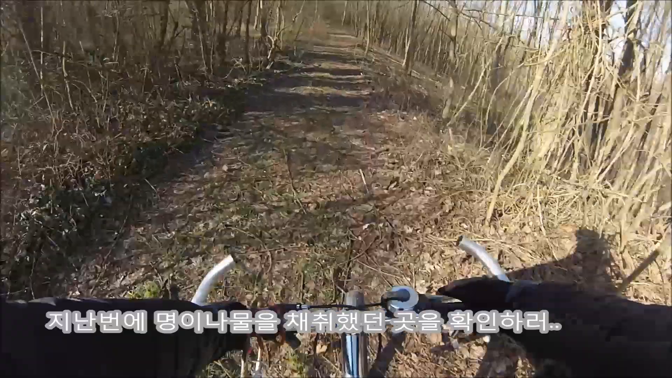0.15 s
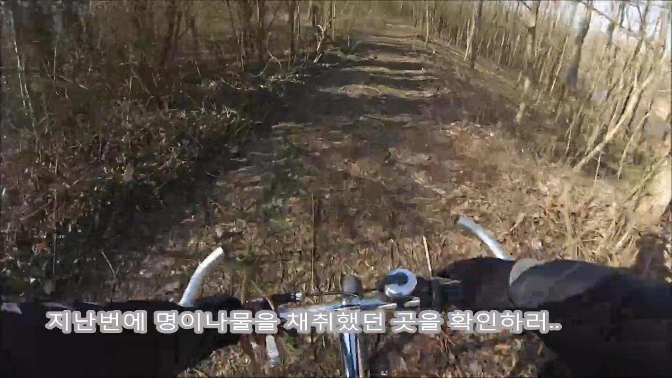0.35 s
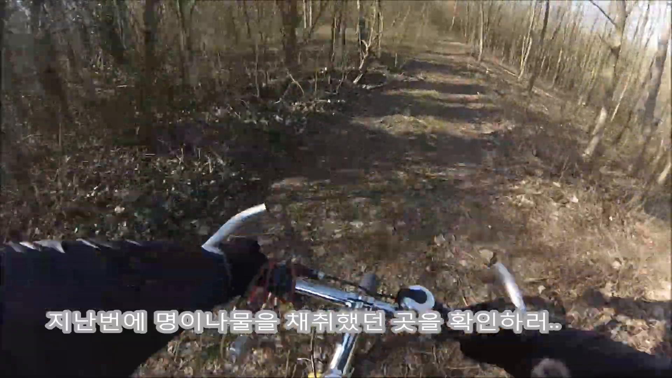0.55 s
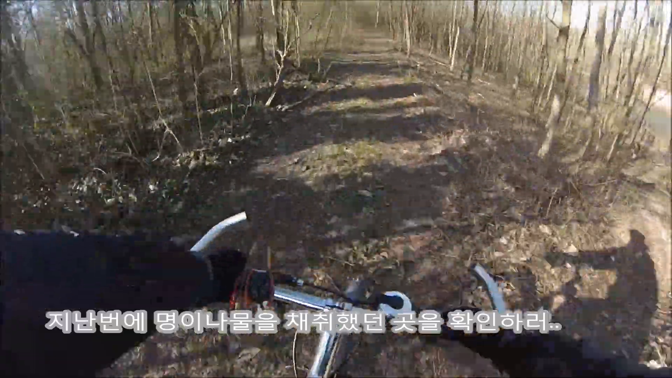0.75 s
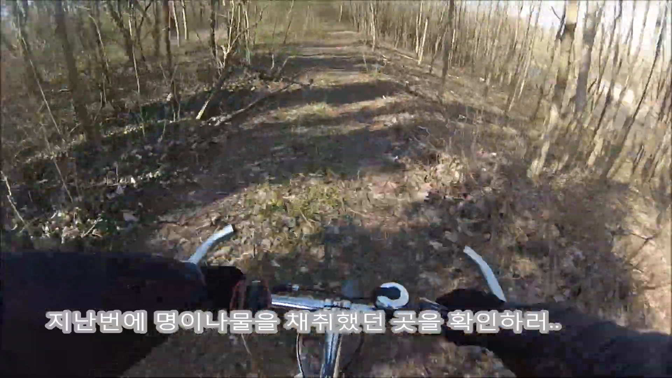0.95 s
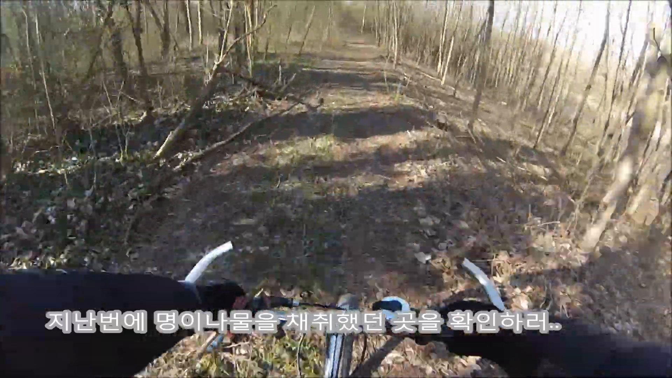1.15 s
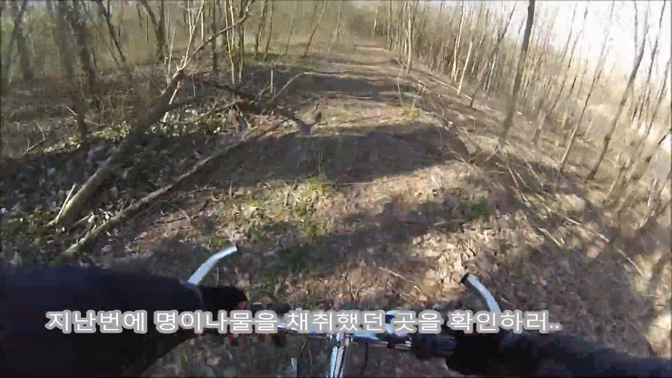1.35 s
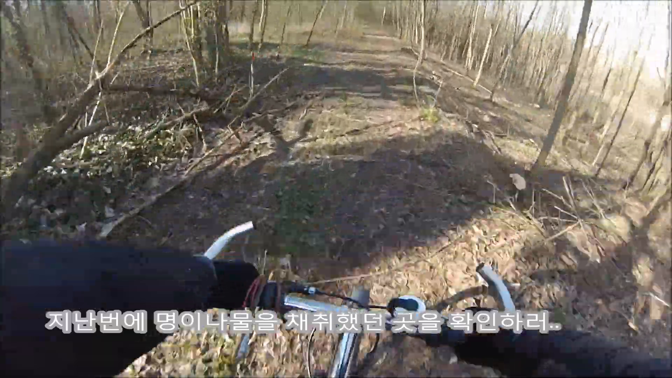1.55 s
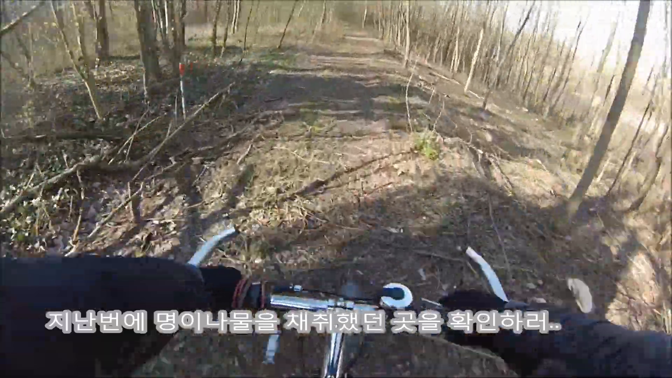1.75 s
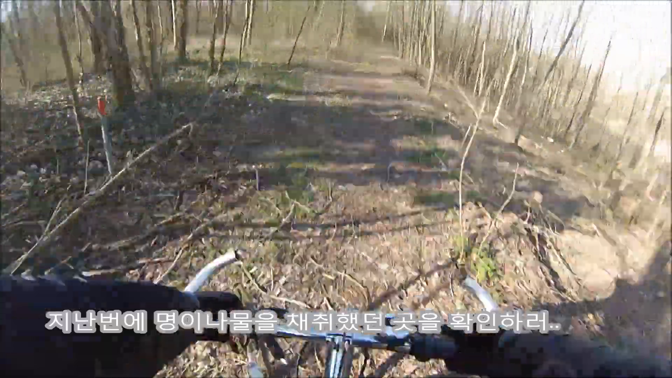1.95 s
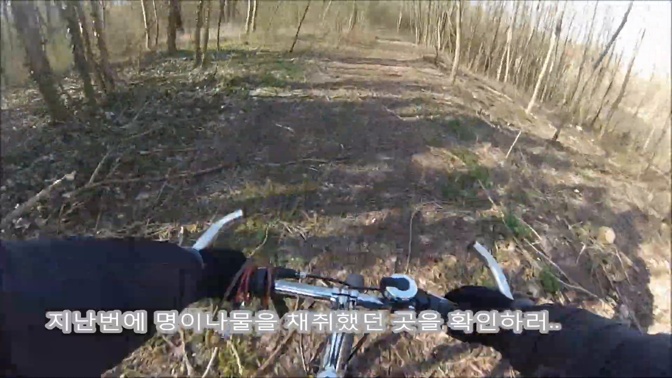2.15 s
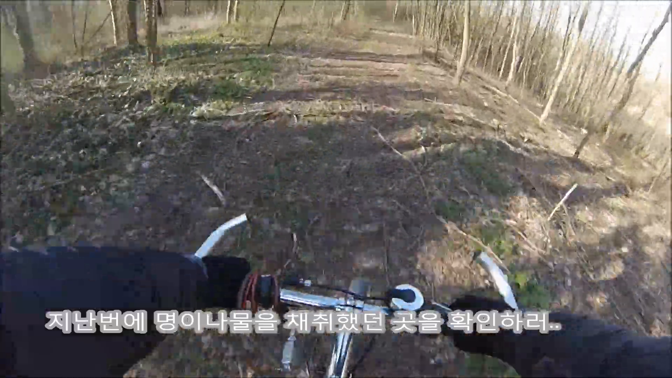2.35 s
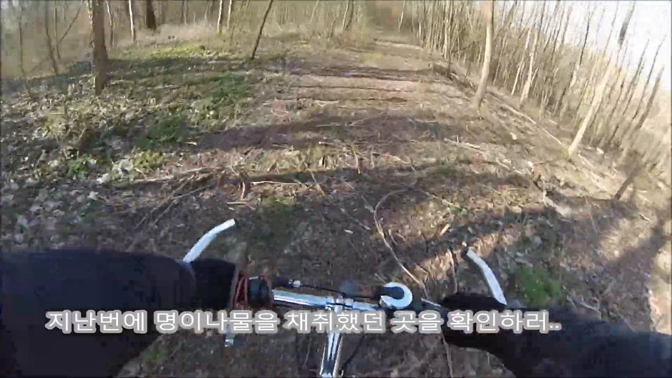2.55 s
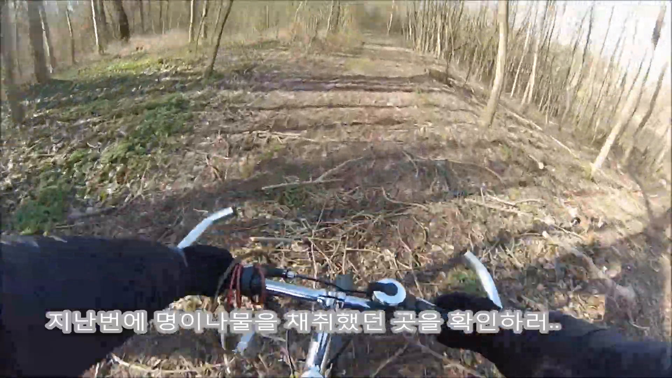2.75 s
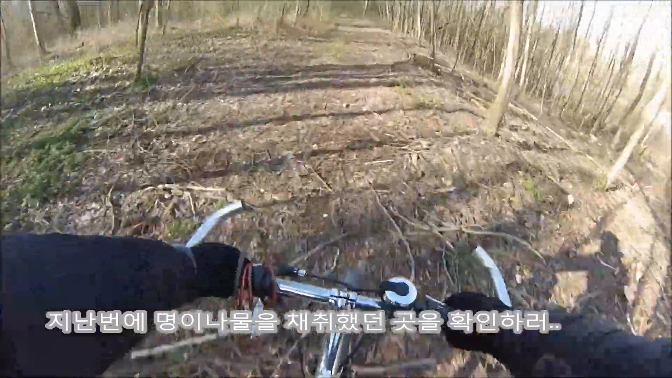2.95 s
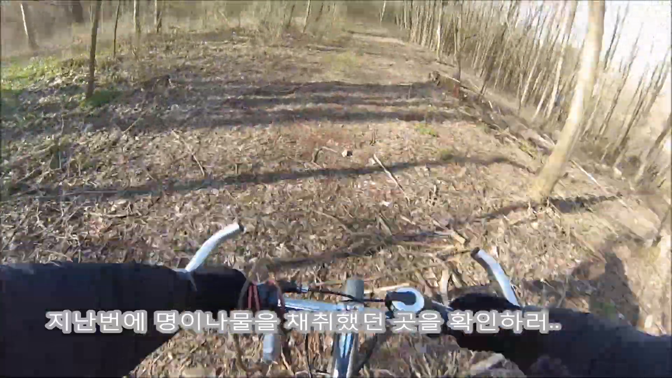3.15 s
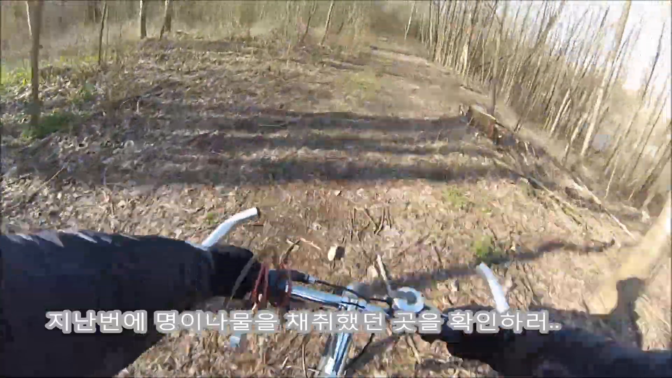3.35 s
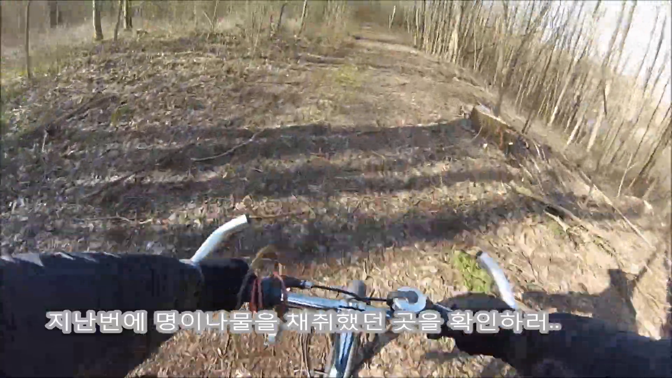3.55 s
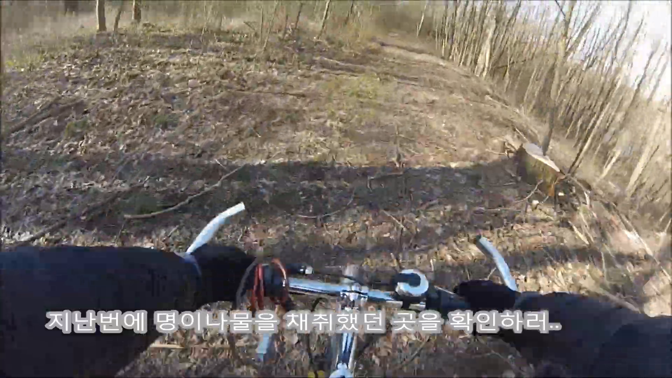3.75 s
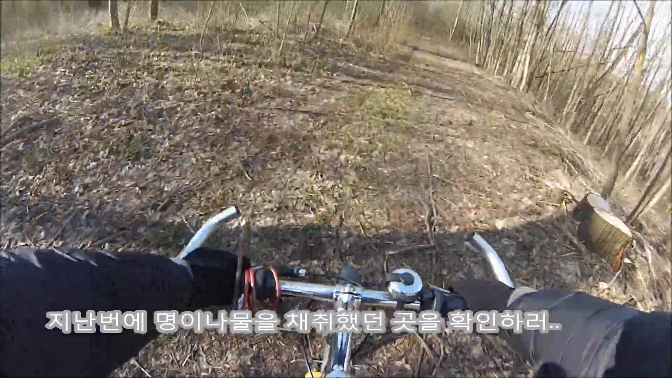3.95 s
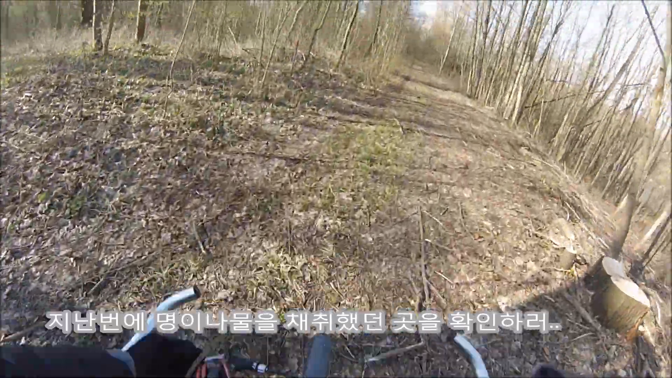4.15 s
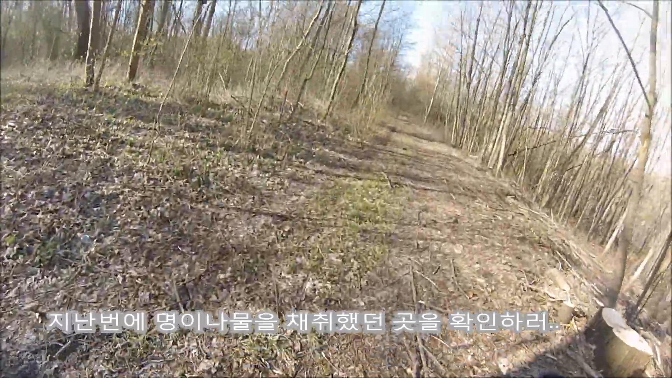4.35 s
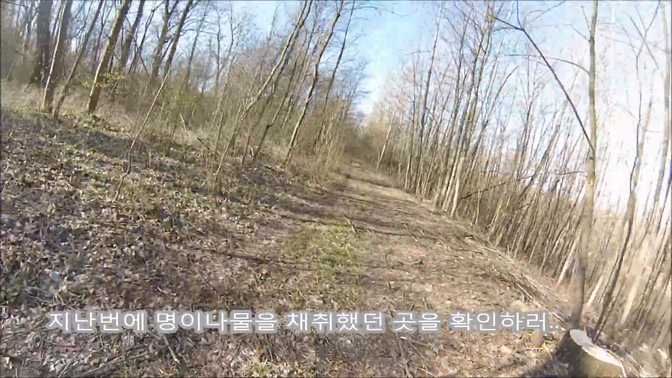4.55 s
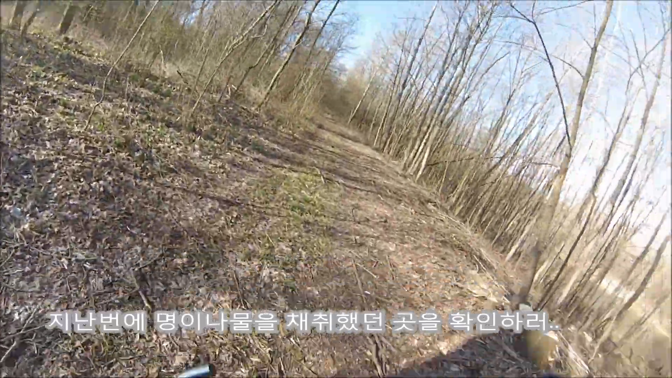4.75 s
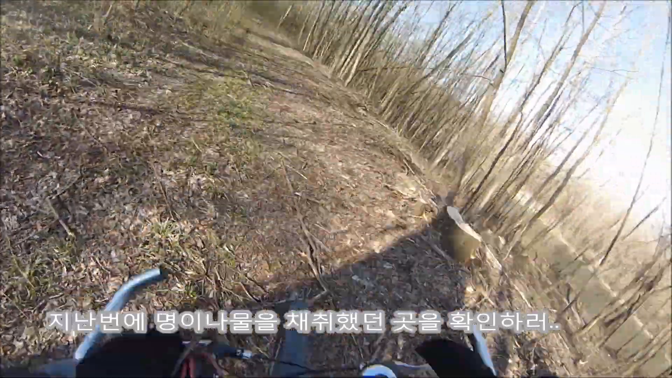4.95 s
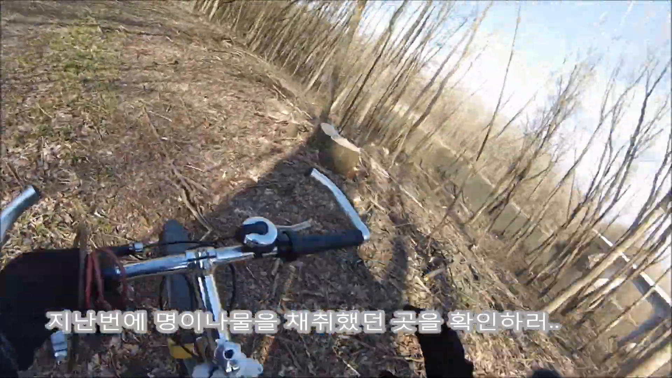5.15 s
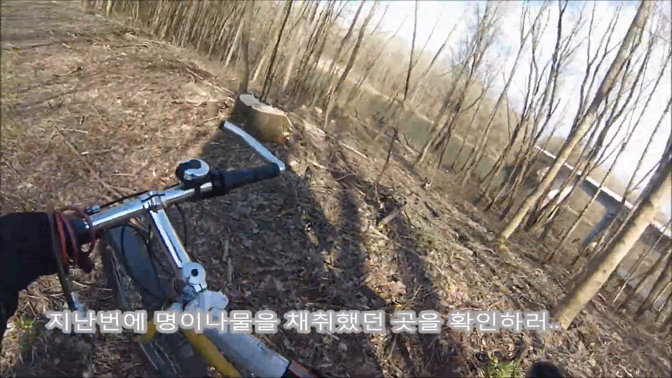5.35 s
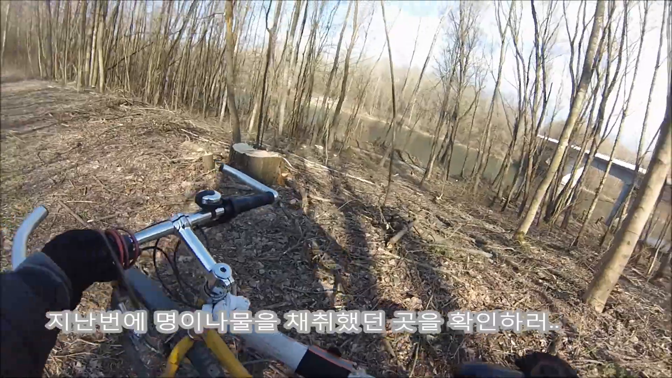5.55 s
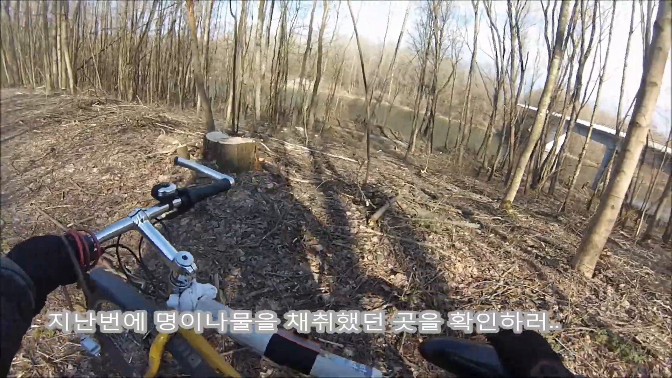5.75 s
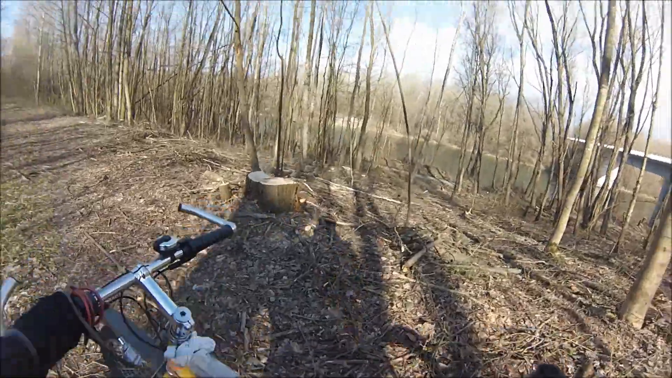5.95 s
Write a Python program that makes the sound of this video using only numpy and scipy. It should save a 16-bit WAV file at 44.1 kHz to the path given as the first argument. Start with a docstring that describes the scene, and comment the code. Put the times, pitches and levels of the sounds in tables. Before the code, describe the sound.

A rough bike ride outdoors, captured by a body-worn microphone: deep lumpy wind dominates, with crisp leaf crunches, dull rattling bumps and sharp little twig cracks, strongest around two and three and a half seconds. Then rolling ends abruptly. The quiet remainder holds short cloth rustles, a low rub of the moving body, and a few scuffs and soft thuds against the microphone case.

```python
"""A bicycle rolls along a forest path, heard from the rider's body, over a faint forest hush.
Wind rumbles on the microphone as coloured noise; tyres crush dry leaves as clumps of random clicks.
Bumps knock the frame and twigs snap as struck modes; metal parts ring and squeak faintly as sine tones.
After four seconds it stops; as the rider gets off, sleeves swish as clicks through the case's cavities
and brush against the microphone case as short scuffs and thuds."""
import sys
import numpy as np
from scipy import signal
from scipy.fft import rfft, irfft
from scipy.io import wavfile
from scipy.ndimage import uniform_filter1d

SR = 44100
rng = np.random.default_rng(int(sys.argv[2]) if len(sys.argv) > 2 else 0)


def store_wav(level_fs):
    """Save 16-bit WAV to argv[1]."""
    pcm = np.round(np.clip(np.atleast_2d(level_fs), -1, 1) * 32767)
    wavfile.write(sys.argv[1], SR, pcm.T.astype(np.int16))


N = 264864
TIME = np.arange(N) / SR


def from_db(db):
    """Decibels to amplitude gain."""
    return 10 ** (np.asarray(db) / 20)


def rms_one(x):
    """Scale to rms 1."""
    return x / np.sqrt(np.mean(x ** 2) + 1e-20)


def in_time(rows):
    """Interpolate each column of a curve table, sample by sample."""
    s, *columns = np.transpose(rows)
    return [np.interp(TIME, s, c) for c in columns]


def band(x, low_hz, high_hz, order=2):
    """Causal Butterworth band-pass."""
    edges_hz = [low_hz, min(high_hz, 0.45 * SR)]
    sos = signal.butter(order, edges_hz, "band", fs=SR, output="sos")
    return signal.sosfilt(sos, x + 1e-18)


def colour(x, points):
    """Give a steady sound a spectrum, falling 24 dB per octave outside the points; rms 1."""
    hz, db = np.transpose(points)
    freqs = np.maximum(np.arange(N // 2 + 1) * SR / N, 1)
    octaves_outside = np.abs(np.log2(freqs / np.clip(freqs, hz[0], hz[-1])))
    gain_db = np.interp(np.log(freqs), np.log(hz), db) - 24 * octaves_outside
    return rms_one(irfft(rfft(x) * from_db(gain_db), N))


def drift(rate_hz):
    """Smooth random curve with rms 1: noise through a double pole at rate_hz."""
    step = 40  # samples per slow point
    r = np.exp(-2 * np.pi * rate_hz * step / SR)
    noise = rng.standard_normal(N // step + 2002)
    slow = signal.lfilter([1], [1, -2 * r, r * r], noise)[2000:]  # drop the run-in
    return np.interp(np.arange(N) / step, np.arange(len(slow)), rms_one(slow))


def steady(x, window_s):
    """Even out slow swells, so that the driving force alone sets the level."""
    return x / np.sqrt(uniform_filter1d(x ** 2, int(window_s * SR)) + 1e-6)


def grains(per_s, spread_db):
    """Random clicks of either sign, mostly small and a few large; rms 1."""
    sizes = from_db(spread_db * np.minimum(rng.exponential(1, N), 4))
    signs = rng.choice([-1, 1], N)
    return rms_one(sizes * signs * (rng.random(N) < per_s / SR))


def clicks(times_s, heights):
    """One single-sample click at each time."""
    out = np.zeros(N)
    out[np.round(np.asarray(times_s) * SR).astype(int)] = heights
    return out


def strike(times_s, db, modes, vary_db):
    """Each blow rings every decaying mode with a random strength of its own."""
    out = 0
    chance = rng.standard_normal((len(times_s), len(modes)))
    for k, (hz, mode_db, t60_s) in enumerate(modes):
        r = from_db(-60 / (t60_s * SR))
        w = 2 * np.pi * hz / SR
        blows = clicks(times_s, from_db(db + mode_db + vary_db * chance[:, k]))
        ring = signal.lfilter([0, np.sin(w)], [1, -2 * r * np.cos(w), r * r], blows + 1e-18)
        out = out + (-1) ** k * ring
    return out


def swells(times_s, half_s, db):
    """Summed power of rounded swells, as a gain."""
    power = 0
    for s, half, peak_db in np.broadcast(times_s, half_s, db):
        power = power + from_db(2 * peak_db) / (1 + ((TIME - s) / half) ** 2 / 2) ** 4
    return np.sqrt(power)


def tone(hz):
    """Sine that follows a frequency curve."""
    return np.sin(2 * np.pi * np.cumsum(hz) / SR)


# hush spectrum: (frequency [Hz], relative level [dB])
HUSH_COLOUR = [(35, -41), (60, 9), (110, -16), (159, -10), (413, -11.5), (521, -16.5), (1320, -23.5),
               (1870, -25.5), (2840, -27.5), (3760, -24), (4630, -34.5), (5450, -31.5), (15500, -36)]


def forest_hush():
    """Steady coloured noise."""
    return from_db(-72.0) * colour(rng.standard_normal(N), HUSH_COLOUR)


# headwind on the port, falling away as the bicycle stops: (time [s], level [dB])
WIND = [(0.0, -52), (1.4, -48), (2.5, -47.5), (2.95, -43), (3.45, -45.5), (3.6, -51.5), (4.02, -48),
        (4.09, -69), (4.9, -75), (5.3, -61), (6.0, -69.5)]
# wind spectrum: (frequency [Hz], relative level [dB])
WIND_COLOUR = [(18, 1), (28, 3.5), (39, 2), (55, -2.5), (75, -11.5), (100, -17), (150, -25), (250, -39),
               (500, -53)]
# bicycle pitches over humps, buffeting the port: (time [s], level [dB])
BUFFETS = [(0.262, -44), (0.37, -42.5), (0.73, -44.5), (1.13, -47.5), (1.44, -46), (1.55, -43),
           (1.7, -42.5), (1.82, -42.5), (2.039, -36.5), (2.182, -41.5), (2.45, -41), (2.582, -43.5),
           (2.82, -46), (3.06, -37.5), (3.48, -41), (3.721, -42)]
BUFFET_HALF_S = 0.036


def wind(lumpy_db=2.0):
    """Lumpy low turbulence at the port, swelling in buffets, much weaker after the stop."""
    level_db, = in_time(WIND)
    humps_s, hump_db = np.transpose(BUFFETS)
    headwind = from_db(level_db + lumpy_db * drift(rate_hz=7.9))
    force = np.hypot(headwind, swells(humps_s, BUFFET_HALF_S, hump_db))
    return force * steady(colour(rng.standard_normal(N), WIND_COLOUR), window_s=0.055)


# steady rolling: (time [s], leaf crunch level [dB], frame shudder level [dB])
ROLLING = [(0.0, -76, -72), (1.3, -76.5, -69.5), (1.7, -73, -66.5), (2.3, -80.5, -73.5), (2.7, -71.5, -66),
           (2.9, -79, -65.5), (3.3, -69.5, -65), (3.55, -75.5, -69.5), (4.1, -80.5, -77)]
# patches of dry leaves under the wheels: (time [s], half length [s], crunch level [dB])
PATCHES = [(0.101, 0.018, -69.5), (0.361, 0.05, -63), (0.484, 0.013, -66), (0.571, 0.035, -66),
           (0.89, 0.033, -77), (0.947, 0.012, -64), (1.02, 0.033, -62.5), (1.17, 0.03, -69.5),
           (1.443, 0.02, -72.5), (1.546, 0.0091, -63.5), (1.845, 0.031, -64.5), (1.999, 0.045, -58.5),
           (2.143, 0.072, -64.5), (2.302, 0.021, -73), (2.411, .012, -67), (2.483, .015, -69),
           (2.594, 0.0063, -59.5), (2.813, 0.032, -69), (3.024, 0.048, -59), (3.243, 0.018, -65.5),
           (3.432, 0.041, -56), (3.705, 0.038, -62.5)]
# leaf and shudder spectra: (frequency [Hz], relative level [dB])
LEAF_COLOUR = [(400, -26), (800, -9.5), (1150, -6), (1550, 3), (1950, -3), (2600, 6), (3400, 5),
               (4000, -2.5), (4550, 8), (5500, -4.5), (7200, -11), (10500, -14.5), (15500, -18)]
SHUDDER_COLOUR = [(80, -8.5), (140, 0), (220, 1), (350, 3.5), (470, -8.5), (660, -16), (850, -10),
                  (1200, -29.5), (2500, -52)]
# frame shudder relative to patch crunch, and to hump buffet
PATCH_SHUDDER_DB, HUMP_SHUDDER_DB = -2.5, -24


def tyres(uneven_db=2.0):
    """Leaves break in clumps of tiny cracks, swelling in each patch; patches and humps shake the frame."""
    crunch_db, shudder_db = in_time(ROLLING)
    patches_s, half_s, patch_db = np.transpose(PATCHES)
    humps_s, hump_db = np.transpose(BUFFETS)
    ground_db = uneven_db * drift(rate_hz=5.3)

    crunch = np.hypot(from_db(crunch_db + ground_db), swells(patches_s, half_s, patch_db))
    cracks = grains(per_s=3800, spread_db=1.5) * from_db(3.62 * drift(rate_hz=60))
    leaves = steady(colour(cracks, LEAF_COLOUR), window_s=0.048)

    patch_jolts = swells(patches_s, half_s, patch_db + PATCH_SHUDDER_DB)
    hump_jolts = swells(humps_s, BUFFET_HALF_S, hump_db + HUMP_SHUDDER_DB)
    shake = np.hypot(from_db(shudder_db + ground_db), np.hypot(patch_jolts, hump_jolts))
    shudder = steady(colour(grains(per_s=200, spread_db=2.5), SHUDDER_COLOUR), window_s=0.11)
    return crunch * leaves + shake * shudder


# metal part singing while the wheels turn: (time [s], level [dB])
SINGING = [(0.0, -103), (0.9, -95), (1.39, -103), (1.43, -83), (1.75, -94), (2.2, -84), (2.9, -96),
           (3.5, -96), (4.12, -104)]


def singing_metal(pitch_hz=8660, waver=0.003, flicker_db=3.0):
    """A thin partial with unsteady pitch and level."""
    level_db, = in_time(SINGING)
    level = from_db(level_db + flicker_db * drift(rate_hz=4.1))
    return level * tone(pitch_hz * (1 + waver * drift(rate_hz=20)))


# harder bumps: (time [s], blow level [dB])
KNOCKS = [(0.042, -56), (0.274, -48.5), (0.577, -51), (0.711, -52), (0.746, -53), (1.114, -48),
          (1.145, -51.5), (1.267, -52), (1.426, -48.5), (1.68, -47), (1.749, -52), (2.001, -43),
          (2.046, -53), (2.098, -51.5), (2.284, -55.5), (2.806, -50.5), (2.848, -46), (2.901, -55),
          (2.974, -46), (3.019, -47), (3.119, -54), (3.2, -52), (3.4, -46.5), (3.444, -56), (3.579, -53.5),
          (3.952, -52.5), (3.996, -57.5), (4.109, -53), (4.196, -52)]
# frame and mount modes: (frequency [Hz], relative level [dB], t60 [s])
FRAME_MODES = [(165, -1, 0.027), (250, 2, 0.03), (339, 0.5, 0.037), (443, -1, 0.0094), (920, -14, 0.021)]


def frame():
    """Roots and stones excite the frame modes in dull knocks."""
    times_s, db = np.transpose(KNOCKS)
    return band(strike(times_s, db, FRAME_MODES, vary_db=2.4), 68, 1200)


def jolted_metal(pitch_hz=14633, waver=0.00092, below_buffet_db=-42, half_s=0.056):
    """A higher partial flares on each hump."""
    humps_s, hump_db = np.transpose(BUFFETS)
    flare = swells(humps_s, half_s, hump_db + below_buffet_db)
    return flare * tone(pitch_hz * (1 + waver * drift(rate_hz=15)))


# twigs breaking: (time [s], blow level [dB], treble relative to blow [dB])
SNAPS = [(0.2855, -53, -5), (0.313, -49.5, -15), (1.155, -55.5, -26), (1.449, -50.5, -25),
         (1.544, -52, -18), (1.849, -49, -26), (1.947, -48.5, -25), (2, -44, -21), (2.0085, -29, -27),
         (2.101, -43.5, -21), (2.6042, -48.5, -27), (2.9772, -40, -22), (3.0182, -45.5, -30),
         (3.1987, -48.5, -21), (3.2275, -47, -1.5), (3.3094, -54, -30), (3.3431, -46, -32),
         (3.4048, -43, -19), (3.4461, -40.5, -29), (4.0664, -53.5, -33), (4.9128, -63.5, 7),
         (4.9825, -52.5, -7)]
# snap ringing in the microphone case: (frequency [Hz], relative level [dB], t60 [s])
SNAP_MODES = [(1390, -6.5, 0.003), (2770, -5.5, 0.0054), (3120, -3.5, 0.0032), (3820, -3.5, 0.0042),
              (4430, -6.5, 0.012), (5870, -19, 0.0064)]


def twigs(splinter_s=0.0028, give_s=0.0026):
    """Fibres crackle around each break, which rings the case and throws a brief bright spray."""
    times_s, db, treble_db = np.transpose(SNAPS)
    crack = strike(times_s, db, SNAP_MODES, vary_db=1.8)

    strain = 0
    for s, peak_db in zip(times_s, db):
        strain = strain + from_db(peak_db) * np.exp(-np.abs(TIME - s) / give_s)
    fibres = from_db(-14.0) * strain * colour(grains(per_s=7000, spread_db=5.5), LEAF_COLOUR)

    breaks = clicks(times_s, from_db(db + treble_db))
    burst = signal.lfilter([1], [1, -np.exp(-1 / (splinter_s * SR))], breaks)
    spray = from_db(-6.5) * burst * rms_one(band(rng.standard_normal(N), 4600, 12700))
    return crack + fibres + spray


# tiny squeaks: (time [s], length [s], start pitch [Hz], end pitch [Hz], peak level [dB])
SQUEAKS = [(0.87, 0.0046, 1440, 1500, -58), (1.327, 0.017, 9700, 11100, -75),
           (1.525, 0.27, 3590, 3550, -79), (2.312, .04, 12200, 10500, -79), (2.44, 0.1, 14600, 13900, -79),
           (2.545, 0.033, 10700, 10000, -81), (3.633, 0.048, 10750, 10600, -79.5)]


def squeaks(rough=0.0095):
    """Now and then a metal part squeaks in a short rough glide."""
    out = 0
    waver = 1 + rough * drift(rate_hz=400)
    for s, length_s, start_hz, end_hz, db in SQUEAKS:
        part = np.clip((TIME - s) / length_s, 0, 1)
        glide_hz = start_hz + (end_hz - start_hz) * part
        out = out + from_db(db) * np.sin(np.pi * part) * tone(glide_hz * waver)
    return out


def cloth_hiss(resonances):
    """Threads catching on threads excite each cavity of the case; rms 1."""
    out = 0
    for hz, width_hz, db in resonances:
        threads = grains(per_s=14000, spread_db=3.5)
        out = out + from_db(db) * rms_one(band(threads, hz - width_hz / 2, hz + width_hz / 2))
    return rms_one(out)


# jacket strokes: (start [s], end [s], level [dB], edge relative to swish [dB], swell start to end [dB])
STROKES = [(4.142, 4.214, -67, -5, -1), (4.268, 4.299, -62.5, -6, -2), (4.355, 4.443, -55.5, -6.5, 0.5),
           (4.453, 4.486, -66, -3, -4), (4.488, 4.566, -56, -1, 9), (4.593, 4.682, -59, -3, -4),
           (4.68, 4.777, -70.5, 2, -7), (5.011, 5.127, -65.5, 4, 4.5), (5.137, 5.186, -64.5, 4.5, 2),
           (5.205, 5.31, -71.5, -2.5, -1), (5.334, 5.482, -61.5, -0.5, -5.5),
           (5.561, 5.57, -45.5, -2, -4.5), (5.604, 5.662, -64.5, -2.5, 5), (5.694, 5.78, -68.5, -4.5, -2),
           (5.79, 5.85, -66.5, 1, 0)]
# case cavities, soft swish to keen edge and air: (frequency [Hz], width [Hz], relative level [dB])
CLOTH_SWISH = [(2386, 690, -8.5), (2965, 770, 2), (3770, 380, -17.5)]
CLOTH_EDGE = [(4593, 490, 1.5), (5260, 250, -10), (6210, 690, -9)]
CLOTH_AIR = [(8030, 830, -4.5), (9850, 1300, 1.5), (11800, 1100, -8), (12500, 3200, 0)]
# low rub of the moving body: (time [s], level [dB])
RUB = [(4.1, -79), (4.47, -69), (4.602, -75), (4.778, -75), (5.43, -70), (5.594, -74), (5.822, -80),
       (6.006, -74)]
# body shifting against the frame, a dull rumble: (time [s], half length [s], level [dB])
SHIFTS = [(5.103, 0.0077, -62), (5.439, 0.013, -57.5), (5.471, 0.011, -52.5), (5.562, 0.0065, -57.5),
          (5.807, .008, -59.5)]
# rub spectrum: (frequency [Hz], relative level [dB])
RUB_COLOUR = [(53, -40), (90, -26), (102, -2.5), (225, -10.5), (334, -3), (452, -16.5), (620, -25.5),
              (825, -18), (1170, -28), (1600, -22), (2080, -40), (3520, -120)]


def sleeves(rise_s=0.0052, fall_s=0.0084, lingering_db=-82, air_db=-6.5):
    """Cloth strokes swell or fade over a soft low rub; a trace of rustle lasts between them."""
    start, end, db, edge_db, swell_db = np.transpose(STROKES)[..., None]
    opening = (1 + np.tanh((TIME - start) / (2 * rise_s))) / 2
    closing = (1 + np.tanh((end - TIME) / (2 * fall_s))) / 2
    part = np.clip((TIME - start) / (end - start), 0, 1)
    strokes = opening * closing * from_db(db + swell_db * (part - 0.5))
    swish = strokes.sum(axis=0)
    edge = (strokes * from_db(edge_db)).sum(axis=0)
    trace = from_db(lingering_db + 3.3 * drift(rate_hz=48))

    hiss = np.hypot(swish, trace) * cloth_hiss(CLOTH_SWISH)
    hiss = hiss + np.hypot(edge, 0.5 * trace) * cloth_hiss(CLOTH_EDGE)
    hiss = hiss + from_db(air_db) * edge * cloth_hiss(CLOTH_AIR)

    rub_db, = in_time(RUB)
    rub_force = np.hypot(from_db(rub_db), swells(*np.transpose(SHIFTS)))
    rub = rub_force * colour(grains(per_s=1100, spread_db=4.5), RUB_COLOUR)
    return from_db(0.8 * drift(rate_hz=220)) * hiss + rub


# sleeve on case: (time [s], scuff level [dB], half length [s], thud peak [dB], thud frequency [Hz])
BRUSHES = [(4.561, -57, 0.003, -53, 120), (5.199, -50.5, 0.0084, -37.5, 59.4),
           (5.3465, -42.5, 0.0015, -43, 200), (5.4778, -45, 0.0036, -41, 214),
           (5.564, -58.5, 0.011, -57, 150)]
# scuff spectrum: (frequency [Hz], relative level [dB])
SCUFF_COLOUR = [(260, 9), (380, 0), (540, -13), (850, -11.5), (1300, -13.5), (2100, -6), (3050, -0.5),
                (3900, -3.5), (4600, 1.5), (5600, -15.5), (9000, -21.5), (15000, -20.5)]


def brushes():
    """Cloth catches on the case: a short scuff and one push and pull of air at the port."""
    out = 0
    noise = colour(rng.standard_normal(N), SCUFF_COLOUR)
    for s, scuff_db, half_s, thud_db, thud_hz in BRUSHES:
        scuff = from_db(scuff_db) * noise / np.sqrt(1 + ((TIME - s) / half_s) ** 4)
        phase = 2 * np.pi * thud_hz * (TIME - s)
        thud = -from_db(thud_db) * phase * np.exp((1 - phase ** 2) / 2)
        out = out + scuff + thud
    return out


def scene():
    """The ride gives way to the rider's own movement, over a faint forest hush."""
    rolling = np.interp(TIME, [4.07, 4.13], [1, 0])
    metal = singing_metal() + jolted_metal() + squeaks()
    bicycle = rolling * (tyres() + metal) + frame() + twigs()
    rider = (1 - rolling) * sleeves() + brushes()
    return (forest_hush() + wind() + bicycle + rider)[None]


def record(dry, cutoff_hz=15700):
    """Steep elliptic low-pass: 0.1 dB ripple, 70 dB stop band."""
    return signal.sosfilt(signal.ellip(10, 0.1, 70, cutoff_hz, fs=SR, output="sos"), dry)


dry = scene()
out = record(dry)
store_wav(out)
```